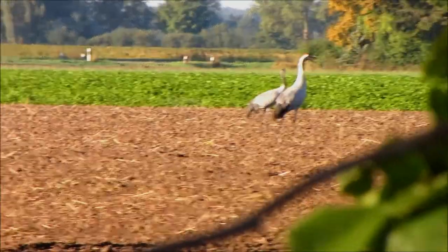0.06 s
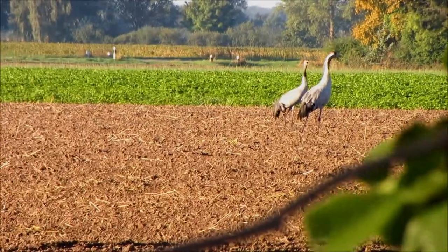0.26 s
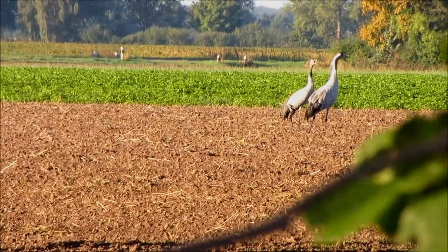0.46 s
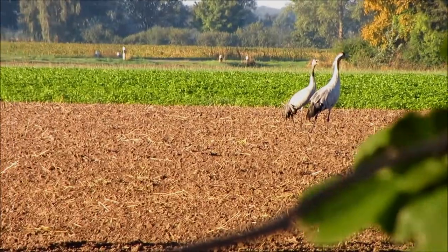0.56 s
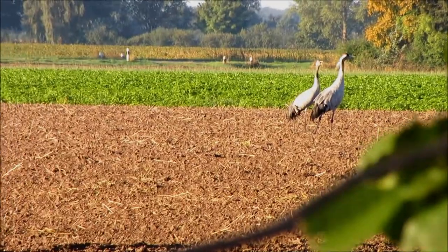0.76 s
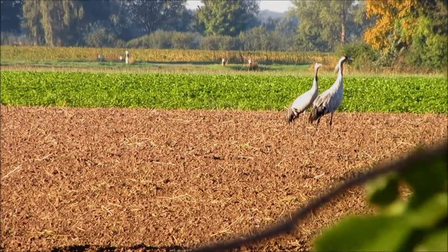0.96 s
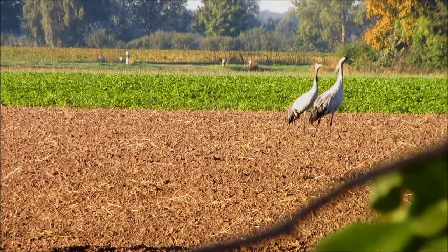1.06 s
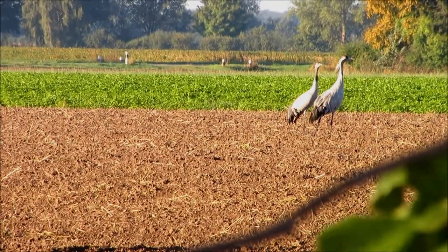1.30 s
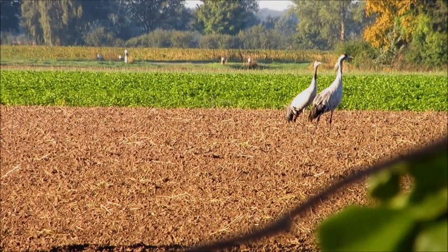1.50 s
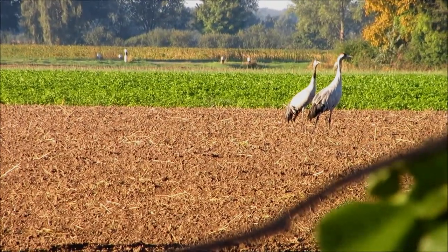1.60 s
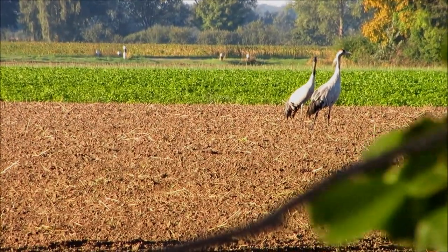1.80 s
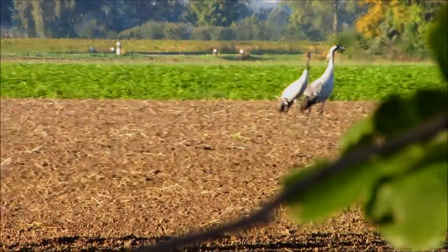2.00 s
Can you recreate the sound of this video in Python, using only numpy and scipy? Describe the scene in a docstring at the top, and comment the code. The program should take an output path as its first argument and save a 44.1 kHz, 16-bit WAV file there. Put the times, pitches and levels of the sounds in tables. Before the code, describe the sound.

Two cranes trumpet loudly across an open field, a rattling call answered by a clearer note

```python
"""Two cranes trumpet across a field: the first purrs, clears to a note with brief pitch breaks and purrs again;
the second joins with one long clear note. Each is a stack of overtones and breath coloured by a throat.
Decaying noise makes a close echo and a later one from tree lines. Shaped noise gives the hush of far
traffic and air; sines make a hum and a high whine, a small bird's falling chirp and a dry tick."""
import sys
import numpy as np
from scipy import signal
from scipy.fft import rfft, irfft, next_fast_len
from scipy.io import wavfile
from scipy.ndimage import map_coordinates

SR = 44100
rng = np.random.default_rng(int(sys.argv[2]) if len(sys.argv) > 2 else 0)


def bounce(signal):
    """Save signal as a 16-bit WAV file at the path given by the first command-line argument."""
    frames = np.transpose(np.atleast_2d(signal))
    limited = np.clip(frames, -1, 1)
    pcm = np.round(limited * 32767).astype(np.int16)
    wavfile.write(sys.argv[1], SR, pcm)


def magnitude_from_level(level_db):
    """Linear magnitude for a level in decibels (20 dB per decade)."""
    exponent = np.asarray(level_db, float) / 20
    return 10 ** exponent


N = 90404  # samples

# Loudness of each call ahead of the throat, and its breath: t/s, level/dB, breath over tone/dB
FIRST_LOUDNESS = [(.183, -67, 12), (.187, -46, 5), (.205, -37.5, -0.5), (.225, -32.5, -6.5),
                  (.26, -31, -4.5), (.29, -26, -12.5), (.31, -29, -6), (.325, -26, -8), (.345, -26, -19),
                  (.36, -27, -11), (.385, -28, -18), (.43, -26.5, -23), (.448, -29.5, -46),
                  (.46, -27.5, -21), (.49, -28.5, -20), (.54, -27.5, -13.5), (.56, -29, -11),
                  (.6, -30, -15), (.652, -32, -2), (.666, -39, -25), (.685, -41.5, -22), (.76, -42.5, -17),
                  (.78, -68, -22)]
SECOND_LOUDNESS = [(.553, -40.5, -20), (.565, -25.5, -19), (.578, -30, -1.5), (.59, -26.5, -9),
                   (.63, -25.5, -24), (.71, -25, -24), (.77, -24.5, -40), (.81, -26, -37), (.846, -25, -33),
                   (.865, -29, -30), (.876, -30.5, -19), (.888, -34.5, -12), (.897, -43.5, -0.5),
                   (.92, -43.5, 2.5), (.945, -54, 6), (.96, -88, -15)]
# Pitch of each call: t/s, f/Hz
FIRST_PITCH = [(.185, 1070), (.2, 1070), (.208, 850), (.25, 890), (.303, 920), (.313, 995), (.33, 1015),
               (.355, 1068), (.366, 1050), (.38, 1060), (.41, 1067), (.43, 1055), (.446, 1040),
               (.458, 1073), (.48, 1066), (.496, 1043), (.512, 1064), (.525, 1040), (.538, 1060),
               (.552, 1030), (.562, 900), (.59, 880), (.652, 840), (.668, 760), (.76, 740)]
SECOND_PITCH = [(.555, 1030), (.57, 1045), (.58, 1085), (.592, 1124), (.64, 1123), (.72, 1122),
                (.766, 1116), (.804, 1113), (.846, 1096), (.862, 1085), (.872, 1062), (.886, 1022),
                (.905, 995), (.93, 960), (.96, 900)]
# Sudden pitch breaks of the first bird: t/s, drop/Hz, length/s
FIRST_BREAKS = [(.371, 190, .009), (.472, 190, .01), (.502, 150, .008), (.529, 165, .008),
                (.546, 140, .007), (.399, 40, .005)]
# How deeply each call purrs: t/s, depth/0-1
FIRST_PURR = [(.19, .15), (.205, .6), (.225, .95), (.25, .9), (.29, .7), (.31, .5), (.33, .15), (.345, 0),
              (.46, 0), (.49, .08), (.545, .12), (.56, .55), (.62, .45), (.652, .25)]
SECOND_PURR = [(.85, 0), (.876, .15), (.89, .2), (.9, .55)]
# Mean speed of the purr: t/s, rate/pulses per s
PURR_RATE = [(.2, 78), (.3, 76), (.5, 102), (.8, 102), (.88, 70)]
# Throat colour of each bird: f/Hz, level/dB
FIRST_THROAT = [(600, -29), (740, -2), (850, 1.5), (1060, 1.5), (1350, -27), (1650, 5), (1900, -16.5),
                (2120, 1), (2400, -11), (2700, -1.5), (2950, -8.5), (3200, -1), (3700, -18.5),
                (4300, -18.5), (4700, -12.5), (5300, -16.5), (6300, -21.5), (7000, -33.5), (12000, -51)]
SECOND_THROAT = [(700, -12.5), (1000, 9), (1120, -6), (1600, 10.5), (2240, 0), (3360, -4.5), (4480, -15),
                 (5600, -10), (6720, -15.5), (7840, -20.5), (8960, -25), (11200, -34), (12300, -44),
                 (15000, -50)]
# Dip in the throat's response, moving with the neck: t/s, f/Hz
FIRST_DIP = [(.3, 1400), (.342, 2050), (.36, 1100), (.38, 1500), (.434, 1600), (.445, 2075), (.451, 2100),
             (.46, 1150), (.48, 1500)]
SECOND_DIP = [(.59, 1600), (.61, 3330), (.64, 2900), (.71, 3050), (.738, 3367), (.77, 3900), (.81, 4050),
              (.86, 3850), (.89, 3600), (.903, 2000), (.93, 1950)]
# Colour of the breath on top of the throat: f/Hz, level/dB
BREATH_RASP = [(500, -4.5), (3500, -0.5), (5000, 6.5), (8000, 1.5)]
# Stereo place of the birds: f/Hz, left over right/dB
BIRD_PAN = [(500, -0.2), (2000, -1.6), (5000, -2.5), (10000, -4.5)]
# Die-away of the tree-line echo and the close echo: f/Hz, t60/s
TREES_DECAY = [(500, 2), (1000, 4.24), (3000, 6), (6000, 1.06), (12000, 0.63)]
NEAR_DECAY = [(500, 0.21), (3000, 0.26), (10000, 0.034)]
# Colour of what reaches the tree lines: f/Hz, level/dB
TREES_TONE = [(500, 8), (1000, 0.5), (2200, -9.5), (3300, -7.5), (6000, 1)]
# Partials of the tick: f/Hz, relative level/dB, t60/s
TICK_PARTIALS = [(1150, 0, .014), (2500, -6, .009), (3500, -6, .005)]
# Spectral shape of the hush, centre and side: f/Hz, relative level per Hz/dB
HUSH_MID = [(13, -40), (22, -9), (40, -6.5), (64, -5), (109, -13), (150, -21.5), (250, -16.5), (454, -16.5),
            (598, -12), (745, -5), (928, -10), (1440, -10), (1850, -12), (2870, -20.5), (6200, -25),
            (10200, -31), (15000, -36.5), (15500, -50), (15800, -80)]
HUSH_SIDE = [(13, -30), (22, -5), (43, -3), (72, -3), (110, -12), (155, -19), (200, -16), (335, -18),
             (507, -18), (745, -16.5), (1350, -18), (2180, -22), (3120, -26.5), (7000, -32), (15000, -43),
             (15500, -54), (15800, -84)]


def crane(loudness, purring, pitch, dip, throat, breaks, flutter_db, flutter_rate):
    """Syrinx overtones through the throat; the purr swings loudness and pitch together; breath hisses along."""
    purr_swing_hz, jitter_hz = 70, 28  # at full purr
    purr_scatter_db, break_db = 2, -2.5  # at full purr; loudness inside a break
    break_breath_db = 10.5  # extra breath inside a break
    pitch_lag, overtone_lag = 0.97, 0.25  # rad of the purr: pitch behind loudness; each overtone behind the last
    upper_share = 0.7  # share of the purr's depth in overtones and breath
    dip_half_width_hz, phase_spread = 313, 0.322  # spread in rad, times overtone number squared
    t = seconds()
    db, breath_db = track(loudness)
    (purr,), (hz,), (dip_hz,), (rate,) = map(track, (purring, pitch, dip, PURR_RATE))
    purr_phase = phase(rate * (1 + 0.0297 * wobble(40.7)))

    slip = np.zeros(N)
    for at, drop_hz, length in breaks:
        slip += drop_hz * np.exp(-(2 * (t - at) / length) ** 4)
    broken = slip / (slip.max() + 1)  # near 1 in the deepest break
    hz = hz - slip
    hz = hz + purr * purr_swing_hz * np.cos(purr_phase - pitch_lag)
    hz = hz + (purr + broken) * jitter_hz * wobble(250) + 0.46 * wobble(61.2)

    k = np.arange(1, 14)[:, None]  # harmonic number
    from_dip = k * hz - dip_hz
    gain = magnitude_from_level(along(throat, k * hz)) * np.abs(from_dip) / np.hypot(from_dip, dip_half_width_hz)
    unsteady = np.array([wobble(flutter_rate) for _ in k])
    gain = gain * magnitude_from_level(flutter_db * (k - 1) * unsteady)
    purr_share = np.where(k > 1, upper_share, 1)
    gain = gain * (1 + purr * purr_share * np.cos(purr_phase - overtone_lag * (k - 1)))
    tone = np.sum(gain * np.cos(k * phase(hz) + phase_spread * k * k), 0)

    breath = unit(coloured_noise(lambda f: along(throat, f) + along(BREATH_RASP, f)))
    breath = breath * (1 + upper_share * purr * np.cos(purr_phase))
    voice = tone + magnitude_from_level(breath_db + break_breath_db * broken) * breath
    swing = magnitude_from_level(purr_scatter_db * purr * wobble(91.8) + break_db * broken)
    sounding = (t > loudness[0][0]) * (t < loudness[-1][0])
    return magnitude_from_level(db) * sounding * swing * voice


def first_crane():
    """A purring call with pitch breaks; its overtones flutter fast."""
    return crane(FIRST_LOUDNESS, FIRST_PURR, FIRST_PITCH, FIRST_DIP, FIRST_THROAT, FIRST_BREAKS,
                 flutter_db=0.55, flutter_rate=70)  # dB per overtone, changes per s


def second_crane():
    """A long clear call that roughens as it ends; its overtones swell slowly."""
    return crane(SECOND_LOUDNESS, SECOND_PURR, SECOND_PITCH, SECOND_DIP, SECOND_THROAT, [],
                 flutter_db=0.2, flutter_rate=14)  # dB per overtone, changes per s


def echo(x, decay, delay_s, wide):
    """A diffuse answer from decaying noise, each frequency dying at its own speed; wide is side over centre."""
    hz, t, z = signal.stft(rng.standard_normal((2, 2 * SR)), SR, nperseg=256)
    fade = magnitude_from_level(-60 * t / along(decay, hz)[:, None])
    tail = signal.istft(z * fade, SR, nperseg=256)[1]
    tail = tail / np.linalg.norm(tail[0])
    late = np.pad(x, (int(delay_s * SR), 0))[None]
    mid, side = signal.fftconvolve(late, tail, axes=1)[:, :N]
    return np.array([mid + wide * side, mid - wide * side])


def tree_echo(calls):
    """Tree lines answer late; moving air and leaves shake the path, so the delay wavers."""
    stir_s = 0.0003
    stirred = map_coordinates(calls, [np.arange(N) + stir_s * SR * wobble(40)])
    far = filtered(stirred, lambda f: magnitude_from_level(along(TREES_TONE, f)))
    return magnitude_from_level(-21) * echo(far, TREES_DECAY, delay_s=0.074, wide=0.45)


def near_echo(calls):
    """A close, short diffuse answer to the calls."""
    return magnitude_from_level(-14) * echo(calls, NEAR_DECAY, delay_s=0.01, wide=0.41)


def tick():
    """A short dry tick: sines start together, rise quickly and die fast, a little left of centre."""
    start_s, level_db, rise_s = 1.5908, -17, 0.0012  # level ahead of rise and pan
    t = np.maximum(seconds() - start_s, 0)
    body = np.zeros(N)
    for hz, db, t60 in TICK_PARTIALS:
        body += magnitude_from_level(level_db + db - 60 * t / t60) * np.sin(2 * np.pi * hz * t)
    return body * (1 - np.exp(-t / rise_s)) * magnitude_from_level([[1.2], [-1.2]])


def chirp():
    """A small bird's faint whistle: one sine gliding down under a rounded envelope."""
    start_s, length_s, from_hz, to_hz = 1.103, 0.058, 6100, 4450
    level_db = -52  # ahead of the envelope
    u = np.clip((seconds() - start_s) / length_s, 0, 1)
    envelope = np.sqrt(u) * np.sin(np.pi * u) ** 0.5
    return magnitude_from_level(level_db) * envelope * np.sin(phase(from_hz + (to_hz - from_hz) * u))


def hush():
    """Far traffic and air as drifting shaped noise, stronger between the channels than in the centre."""
    mid = drifting_noise(HUSH_MID, -48)
    side = drifting_noise(HUSH_SIDE, -44)
    return np.array([mid + side, mid - side])


def drifting_noise(shape, level_db):
    """Noise of a given colour whose level drifts at two speeds around level_db (rms)."""
    drift_db = 0.5 * (wobble(2.31) + wobble(14))
    return magnitude_from_level(level_db + drift_db) * unit(coloured_noise(lambda f: along(shape, f)))


def hum():
    """A low sine, wavering in level and phase."""
    level = magnitude_from_level(-61 + 3 * wobble(11.8))
    return level * np.sin(2 * np.pi * 60 * seconds() + 1.5 * wobble(6.2))


def whine():
    """A steady, very high sine, stronger on the left."""
    return magnitude_from_level(-66) * np.sin(2 * np.pi * 15734 * seconds()) * magnitude_from_level([[2], [-2]])


def seconds():
    """The time of each sample."""
    return np.arange(N) / SR


def phase(hz):
    """Running phase in radians of a moving frequency."""
    return 2 * np.pi * np.cumsum(hz) / SR


def track(rows):
    """One value per sample for each column after the time."""
    s, *columns = np.transpose(rows)
    return [np.interp(seconds(), s, column) for column in columns]


def along(points, hz):
    """Read (f/Hz, value) points on a log frequency axis."""
    f, value = np.transpose(points)
    return np.interp(np.log(hz + 1), np.log(f + 1), value)


def wobble(rate):
    """A smooth random curve, rate knots a second."""
    knots = rng.standard_normal(int(N * rate / SR) + 4)
    return map_coordinates(knots, [np.arange(N) * rate / SR])


def unit(x):
    """Scale to rms 1."""
    return x / np.sqrt(np.mean(x ** 2) + 1e-20)


def filtered(x, response):
    """Shape the spectrum of x by a gain that depends on frequency."""
    m = next_fast_len(N + SR // 2)
    return irfft(rfft(x, m) * response(np.fft.rfftfreq(m, 1 / SR)), m)[..., :N]


def coloured_noise(colour_db):
    """White noise shaped by a dB curve over frequency."""
    return filtered(rng.standard_normal(N), lambda f: magnitude_from_level(colour_db(f)))


def scene():
    """Both birds a little off centre, their echoes, and the field."""
    calls = first_crane() + second_crane()
    direct = filtered(calls, lambda f: magnitude_from_level(along(BIRD_PAN, f) * [[0.5], [-0.5]]))
    echoes = tree_echo(calls) + near_echo(calls)
    return direct + echoes + tick() + chirp() + hush() + hum() + whine()


def roll_off(x):
    """The treble ends steeply here."""
    return signal.sosfilt(signal.butter(12, 16360, fs=SR, output="sos"), x)


def record(dry):
    """Turn the finished mix into the output."""
    return roll_off(dry)


dry = scene()
out = record(dry)
bounce(out)
```